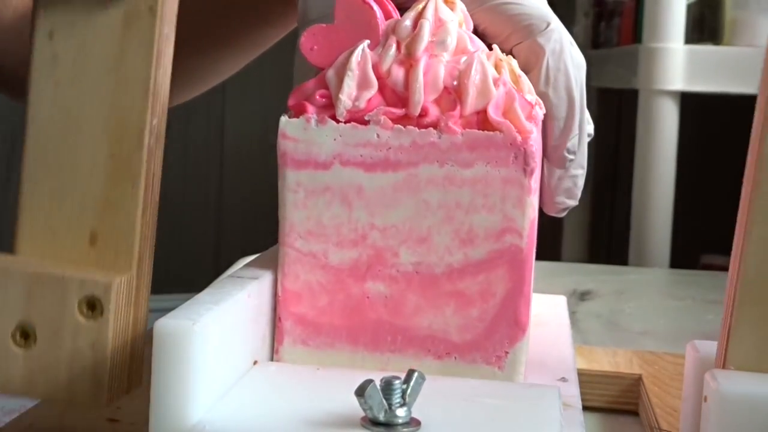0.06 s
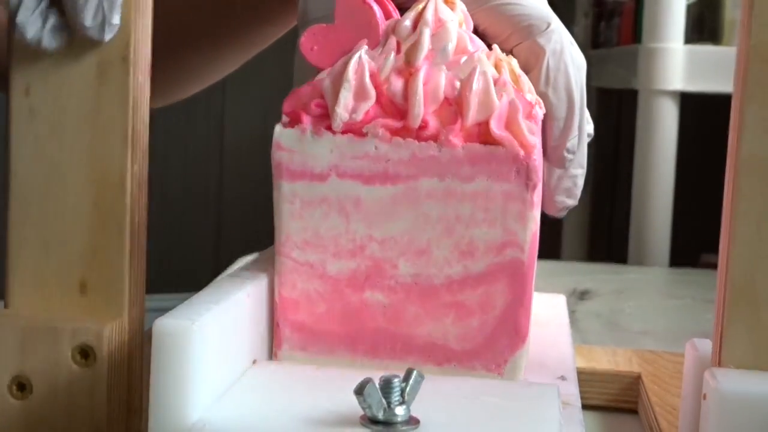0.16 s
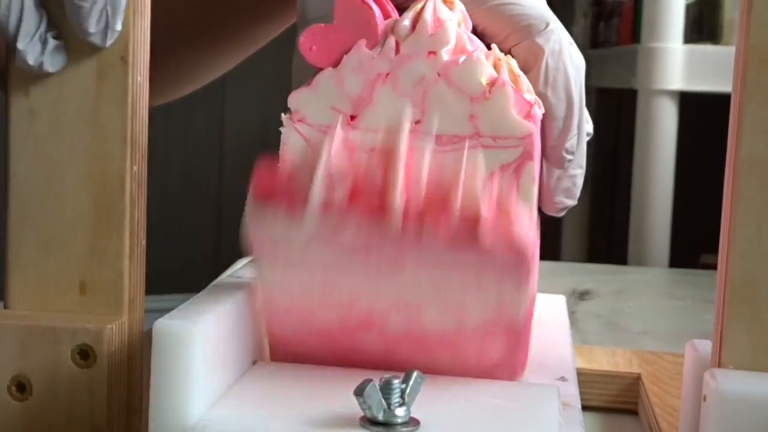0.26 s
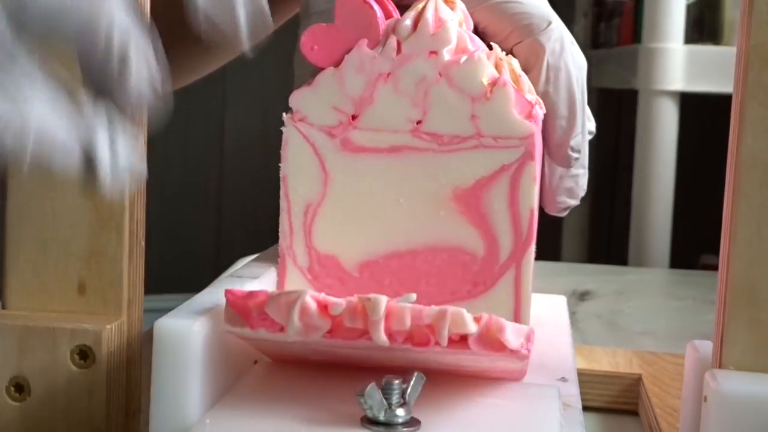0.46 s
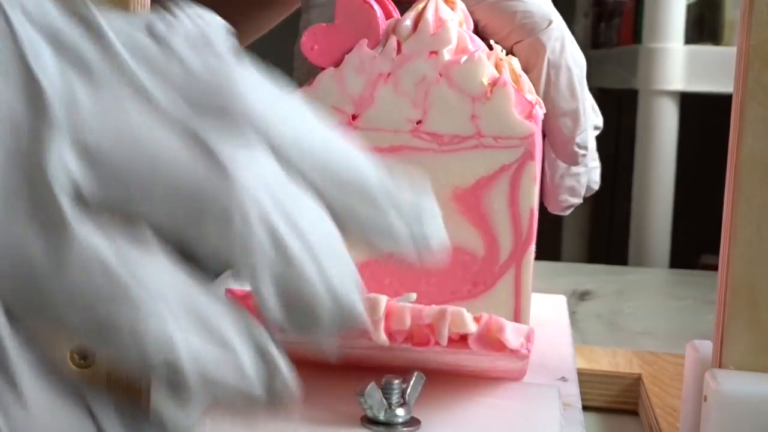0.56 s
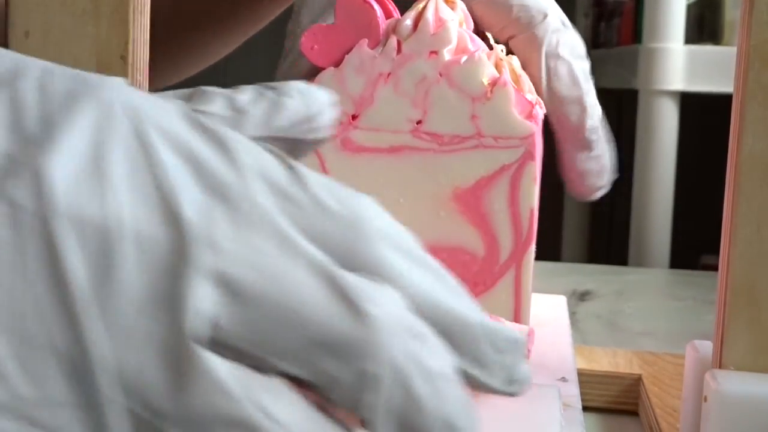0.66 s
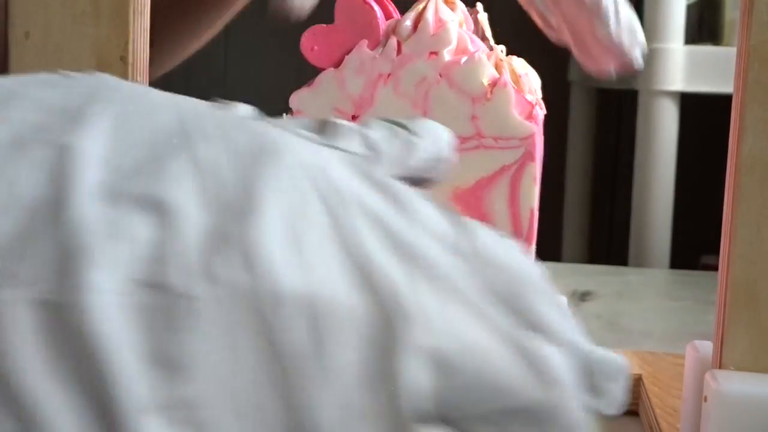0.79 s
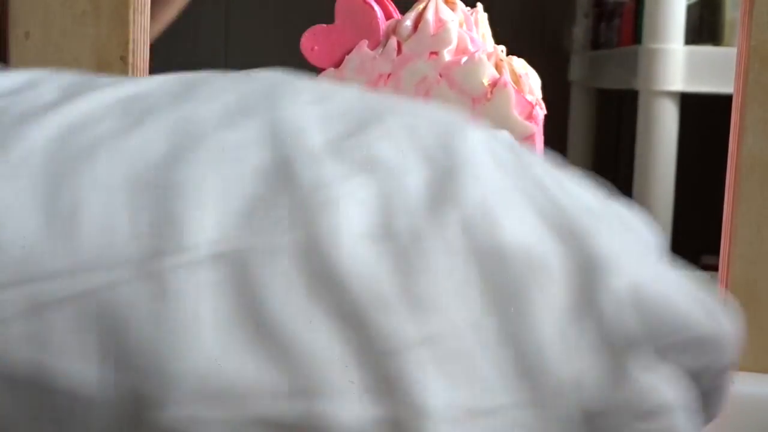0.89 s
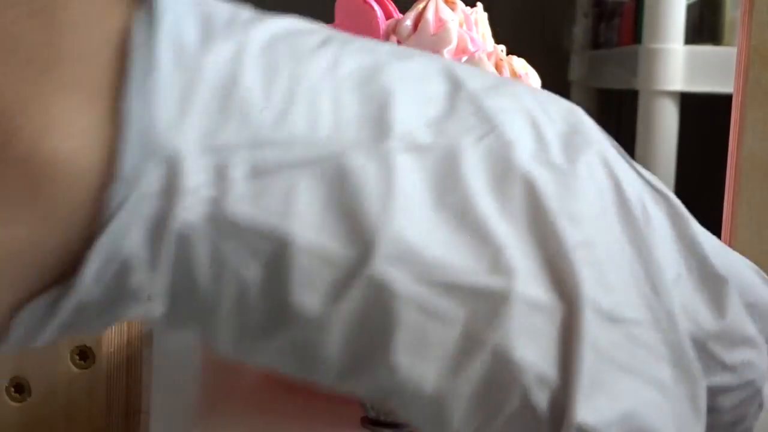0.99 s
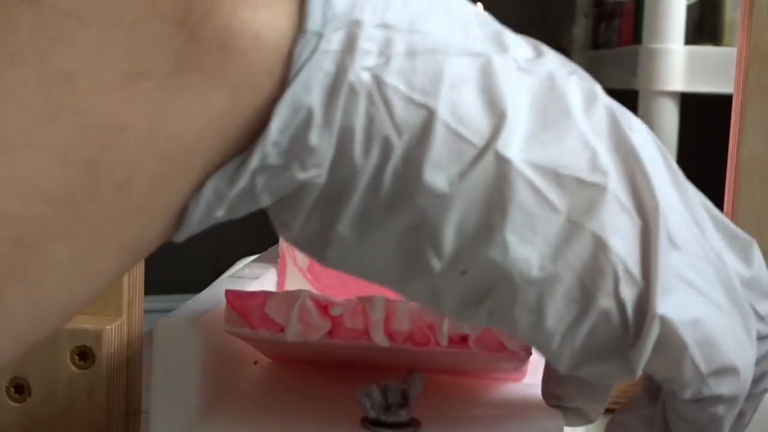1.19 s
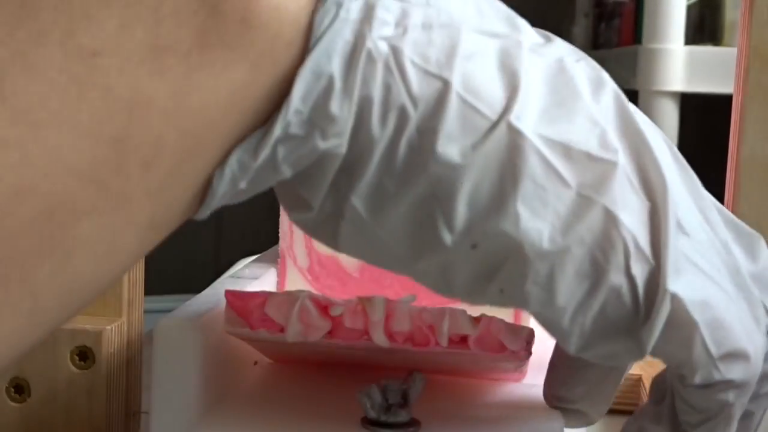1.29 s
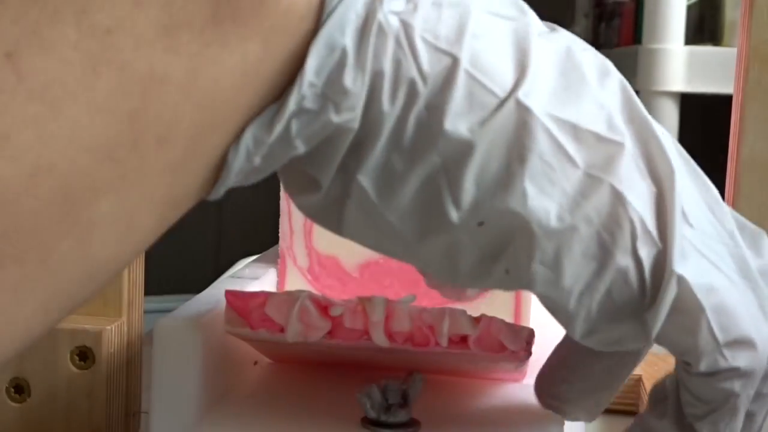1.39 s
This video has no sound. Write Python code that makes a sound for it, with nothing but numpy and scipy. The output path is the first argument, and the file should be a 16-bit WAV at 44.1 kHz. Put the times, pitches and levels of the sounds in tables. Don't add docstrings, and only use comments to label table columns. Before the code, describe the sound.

A soap slice tips over and hits a plastic and wood cutter with a loud, boomy knock and quick rattle, after soft glove rustling; then faint rubbing and distant chirps, close stereo microphone in a quiet room.

```python
import sys
import numpy as np
from scipy import signal
from scipy.fft import rfft, irfft
from scipy.io import wavfile
from scipy.ndimage import uniform_filter1d

SR = 44100
rng = np.random.default_rng(int(sys.argv[2]) if len(sys.argv) > 2 else 0)


def log_audio(samples):
    frames = np.atleast_2d(samples).T
    limited = np.clip(frames, -1, 1)
    pcm = np.round(limited * 32767).astype(np.int16)
    wavfile.write(sys.argv[1], SR, pcm)


def field_ratio(decibels):
    return 10 ** (np.asarray(decibels, dtype=float) / 20)


N = 63945

# (time [s], thump into the table [dB], ring of the frame [dB], crack [dB], contact [ms])
KNOCK_EVENTS = [(0.043, -31, -73, -62, 5.6), (0.0798, -21, -51.5, -39, 1.93), (0.156, -42, -73, -59, 1.1),
                (0.2177, 1.5, -17.5, -14, 1.75), (0.2272, -22, -44, -34, 1.1),
                (0.2353, -32, -37, -30.5, 1.8), (0.246, -13.5, -7.5, -48, 0.38),
                (0.2539, -35, -15.5, -41, 2.5), (0.2588, -1.5, -15, -54, 1.37), (0.2631, -21, -21, -45, 3),
                (0.2683, -35, -28.5, -50, 4.5), (0.275, -9.5, -31, -30, 1.35), (.283, -38, -25, -47.5, 1.8),
                (.292, -28, -21.5, -47.5, 1.9), (0.3087, -16.5, -33, -53, 1.82),
                (0.327, -28, -34, -55, 1.3), (0.3789, -12, -39, -49, 4.2), (0.4014, -19, -45, -58, 5.3),
                (0.4165, -27, -39, -44, 12), (0.755, -44, -59, -62, 4.6), (1.175, -37, -46, -54, 3.2),
                (1.197, -40, -76, -53, 1.3), (1.371, -52.5, -50, -75.5, 4.2)]
# (frequency [Hz], level [dB], t60 [s])
TABLE_MODES = [(51.4, -40, 1.13), (79.1, -35, 1.66), (106.3, -1, 0.099), (133.35, 4.5, 0.18),
               (180.3, -10, 0.13), (218.5, -11, 0.15), (260.2, -7, 0.243), (308, -10.5, 0.077),
               (348.3, 0.5, 0.17), (479, -3.5, 0.11), (591, 0.5, 0.054), (770, -1, 0.02), (759.6, -4, 0.13),
               (970, -6, .1)]
TABLE_POLARITY = [1, -1, -1, 1, -1, 1, -1, 1, 1, -1, 1, -1, 1, -1]
TABLE_LEAN = [-4, -2.5, -2.5, -1.8, -6, -9, 5, -9, -5, 3, -4, 3, -4, 2.5]
# (frequency [Hz], level [dB], t60 [s])
FRAME_MODES = [(1128, -13, 0.029), (1510, -5, 0.022), (1826, -4.5, 0.038), (1897, -4, 0.023),
               (2617, -9, 0.013), (2645, -4.5, 0.0081), (2870, -1, 0.015), (3037, -6, 0.019),
               (3290, -2.5, 0.011), (3570, -17, 0.012), (4290, -14, 0.023), (4920, -17, 0.0071),
               (5700, -12, 0.014), (6850, -16.5, 0.0091)]
# (frequency [Hz], density [dB per Hz])
CRACK_COLOUR = [(400, 2.5), (900, -5.5), (2300, -1), (3300, -3), (5800, -16), (9600, -12), (11500, -23.5),
                (16200, -25)]
# (frequency [Hz], density [dB per Hz])
SLAP_COLOUR = [(300, -2), (700, 5.5), (1200, -19), (3000, -0.5), (4500, -6.5), (6300, -13), (8000, -57),
               (12000, -55)]
# (frequency [Hz], left-right likeness [0-1])
KNOCK_LIKENESS = [(60, 1), (240, 1), (950, 0.71), (2500, 0.87), (4500, 0.15), (15000, 0.044)]
# (frequency [Hz], density [dB per Hz])
RUB_COLOUR = [(35, -24), (60, -14), (398, -7.5), (480, -13), (968, -2.5), (1170, -6.5), (3500, -7),
              (13900, -20.5), (16000, -79)]
# (time [s], level [dB])
RUB_LEVEL = [(0, -42), (.1, -44), (.15, -43.5), (.2, -46), (.5, -51.5), (.65, -55), (.8, -53), (.95, -58.5),
             (1.15, -55.5), (1.22, -58.5), (1.33, -59.5), (1.45, -67)]
# (frequency [Hz], density [dB per Hz])
BRUSH_COLOUR = [(900, -25), (1800, -8), (3500, -5), (5800, 0), (7000, -5), (10000, -6), (14800, -10),
                (15800, -16)]
# (frequency [Hz], density [dB per Hz])
GRIP_COLOUR = [(1200, 1), (2000, 10), (2900, 11.5), (3600, 0), (6000, 4.5)]
# (time [s], level [dB])
GRIP_LEVEL = [(.85, -87.5), (.98, -56), (1.12, -55), (1.2, -76), (1.3, -73), (1.4, -55), (1.45, -57)]
# (frequency [Hz], density [dB per Hz])
DRAG_COLOUR = [(200, -39), (290, -4), (335, -6.5), (400, -15), (520, -23), (700, -22.5)]
# (time [s], level [dB])
DRAG_LEVEL = [(.5, -63), (.6, -52.5), (.74, -61), (.8, -59), (1.15, -77), (1.24, -55), (1.36, -62),
              (1.45, -63)]
# (time [s], level [dB], pitch [Hz], length [cycles])
SHORT_TICKS = [(.0795, -34.5, 2300, 11.7), (0.378, -29, 1927, 2.8), (0.3789, -32, 1220, 5.7),
               (.379, -26, 910, 1.9), (.581, -42, 5700, 6.5), (0.5935, -29.5, 5760, 3.3),
               (.5938, -40, 9000, 2), (.5934, -44, 3500, 2.5), (1.164, -51, 2320, 5),
               (1.169, -42, 1830, 1.8), (1.175, -46, 1385, 4.1), (1.179, -45.5, 1030, 5),
               (1.184, -56, 1490, 4.1)]
# (start [s], length [s], level [dB], from [Hz], to [Hz])
CHIRP_EVENTS = [
    (.624, .04, -56, 3230, 3170),
    (.66, .045, -57, 3330, 3120),
    (.7, .04, -65, 3480, 3450),
    (1.325, .037, -59, 2350, 2950),
    (1.358, .036, -57, 3000, 3170),
    (1.395, .03, -63, 3000, 2800),
]
# (frequency [Hz], t60 [s])
ROOM_DECAY = [(100, 0.54), (300, 0.5), (1000, 0.26), (3000, 0.28), (6000, 0.32), (14000, 0.13)]
# (frequency [Hz], density [dB per Hz])
HISS_COLOUR = [(15, -28), (30, -4.5), (200, -5.5), (450, -5.5), (800, -7.5), (3000, -7), (8000, -8.5),
               (13700, -19.5), (16200, -32)]
# (frequency [Hz], left-right likeness [0-1])
HISS_LIKENESS = [(60, 0.013), (240, 1), (950, 0.61), (3770, 0.048), (15000, 0.082)]


def knocks():
    thump, click = np.zeros((2, 2, N))
    thump_lag_s, slap_db = 0.0022, -1.5
    lean = field_ratio(np.outer([0.5, -0.5], TABLE_LEAN))
    for s, thump_db, ring_db, crack_db, contact_ms in KNOCK_EVENTS:
        u = np.arange(400) / SR / (contact_ms / 1000)
        push = u * np.exp(-4 * u)
        boom = lean @ ring(TABLE_MODES, TABLE_POLARITY, spread_db=0.7).T
        boom = signal.oaconvolve(boom, push[None] / push.sum())
        add(thump, s + thump_lag_s, field_ratio(thump_db) * boom)

        crack = field_ratio(crack_db) * burst(CRACK_COLOUR, t60=0.05)
        slap = field_ratio(ring_db + slap_db) * burst(SLAP_COLOUR, t60=0.025)
        add(click, s, crack + slap)

        chatter = burst([(100, 0), (6500, 0), (8000, -25), (12000, -50)], t60=0.008)
        chatter = chatter / np.linalg.norm(chatter[0])
        frame = ring(FRAME_MODES, 0.89, spread_db=1.5).sum(1)[None]
        add(click, s, field_ratio(ring_db) * signal.oaconvolve(frame, chatter))
    return thump, click


def ring(modes, polarity, spread_db):
    t = np.arange(SR // 2)[:, None] / SR
    hz, db, t60 = np.transpose(modes)
    level_db = db + spread_db * rng.standard_normal(len(hz))
    return polarity * field_ratio(level_db - 60 * t / t60) * np.sin(2 * np.pi * hz * t) / 2


def burst(colour, t60):
    t = np.arange(SR // 8) / SR
    spectrum = rfft(widen(rng.standard_normal((2, len(t)))))
    grit = irfft(spectrum * field_ratio(read(colour, np.fft.rfftfreq(len(t), 1 / SR))), len(t))
    return evened(grit) * field_ratio(-60 * t / t60) * np.minimum(t / 0.0012, 1)


def gloves():
    t = np.arange(N) / SR
    rub = noise(RUB_COLOUR, 0.45, patchy_db=-0.5) * follow(RUB_LEVEL, t)

    brush_s, rise_s, fall_s, brush_db = 0.442, 0.024, 0.036, -43.5
    swell = np.exp(-((t - brush_s) / np.where(t < brush_s, rise_s, fall_s)) ** 2)
    brush = noise(BRUSH_COLOUR, 0.3, patchy_db=2) * field_ratio(brush_db) * swell

    ticks = np.zeros(N)
    short = t[:400]
    for s, db, hz, cycles in SHORT_TICKS:
        u = short * hz / cycles
        envelope = np.e * u * 3 * np.exp(-3 * u)
        add(ticks, s, field_ratio(db) * envelope * np.sin(2 * np.pi * hz * short))

    grip = noise(GRIP_COLOUR, 0.5, patchy_db=2) * follow(GRIP_LEVEL, t)
    drag = noise(DRAG_COLOUR, 0.9, patchy_db=2) * follow(DRAG_LEVEL, t)
    return rub + grip + drag + brush + ticks + field_ratio(-9) * room(ticks)


def chirps():
    out = np.zeros(N)
    for s, length, db, from_hz, to_hz in CHIRP_EVENTS:
        u = np.arange(0, 1, 1 / (length * SR))
        drift = evened(uniform_filter1d(rng.standard_normal(3000), size=200))
        wobble = 1 + 0.45 * drift[:len(u)]
        hz = from_hz + (to_hz - from_hz) * u + 60 * wobble
        whistle = np.sin(2 * np.pi * np.cumsum(hz) / SR)
        add(out, s, field_ratio(db + 5) * wobble * np.sin(np.pi * u) ** 0.5 * whistle)
    return out + field_ratio(-6) * room(out)


def room(x):
    taps = np.zeros((2, SR))
    at = np.arange(160, SR - 20, 20) + rng.integers(0, 20, (2, (SR - 161) // 20))
    np.put_along_axis(taps, at, rng.choice([-1., 1.], at.shape), 1)
    hz, t, z = signal.stft(widen(taps), SR, nperseg=256)
    decay = field_ratio(-60 * t / read(ROOM_DECAY, hz)[:, None])
    tail = signal.istft(z * decay, SR, nperseg=256)[1]
    return signal.fftconvolve(x[None], tail / np.linalg.norm(tail[0]), axes=1)[:, :N]


def room_hiss():
    likeness = read(HISS_LIKENESS, np.fft.rfftfreq(512, 1 / SR))
    return field_ratio(-50.5) * noise(HISS_COLOUR, likeness, patchy_db=0.4)


def noise(colour, likeness, patchy_db):
    frames, hz = N // 128 + 5, np.fft.rfftfreq(512, 1 / SR)
    a, b, c, d, patches = rng.standard_normal((frames, 257, 5)).T
    patches = uniform_filter1d(uniform_filter1d(patches, size=8, axis=0), size=12, axis=1)
    gain = field_ratio(read(colour, hz)[:, None] + patchy_db * evened(patches))
    like = np.clip(likeness * np.ones(257), 0, 1)[:, None]
    left = a + 1j * b
    right = like * left + np.sqrt(1 - like ** 2) * (c + 1j * d)
    z = np.array([left, right]) * gain
    z[:, hz > colour[-1][0]] = 0
    return evened(signal.istft(z, nperseg=512, noverlap=384)[1][:, :N])


def widen(pair):
    like = np.clip(read(KNOCK_LIKENESS, np.fft.rfftfreq(pair.shape[1], 1 / SR)), 0, 1)
    z = rfft(pair)
    mid = np.sqrt((1 + like) / 2) * z[0]
    side = np.sqrt((1 - like) / 2) * z[1]
    return irfft([mid + side, mid - side], pair.shape[1])


def follow(levels, t):
    return field_ratio(np.interp(t, *np.transpose(levels)))


def read(points, hz):
    f, value = np.transpose(points)
    return np.interp(np.log(hz + 1), np.log(f + 1), value)


def evened(x):
    return x / np.sqrt(np.mean(x ** 2) + 1e-20)


def add(mix, s, sound):
    part = mix[..., round(s * SR):][..., :sound.shape[-1]]
    part += sound[..., :part.shape[-1]]


def scene():
    thump, click = knocks()
    hiss = room_hiss()
    room_send = (field_ratio(-16.5) * thump + field_ratio(-1) * click).mean(0)
    return thump + click + hiss + gloves() + chirps() + room(room_send)


def roll_off(x):
    return signal.sosfilt(signal.butter(12, 16320, fs=SR, output="sos"), x)


def record(dry):
    low_cut = signal.lfilter(*signal.butter(2, 45, "high", fs=SR), dry)
    limit = 1.15
    limited = limit * np.tanh(low_cut / limit)
    top_cut = signal.firwin(255, 16100, window=("kaiser", 8), fs=SR)[None]
    mix = signal.oaconvolve(limited, top_cut, "same")
    return roll_off(mix)


dry = scene()
out = record(dry)
log_audio(out)
```